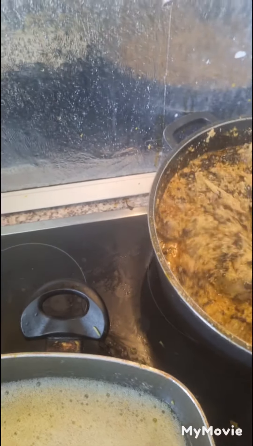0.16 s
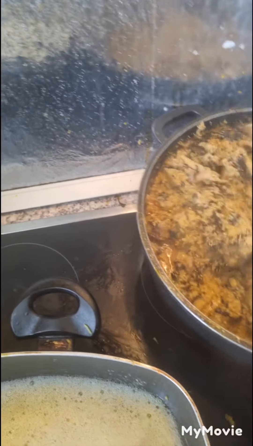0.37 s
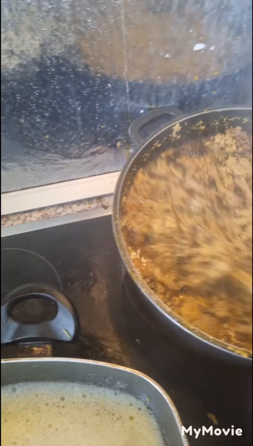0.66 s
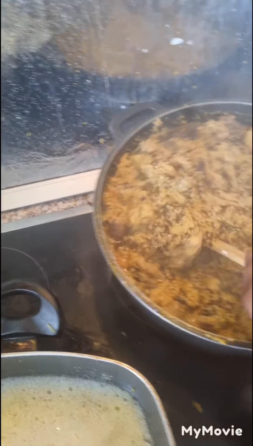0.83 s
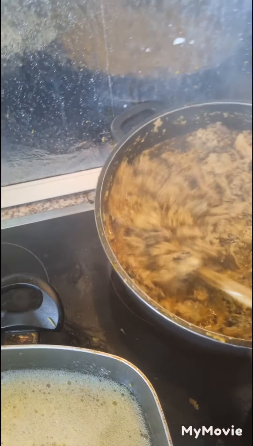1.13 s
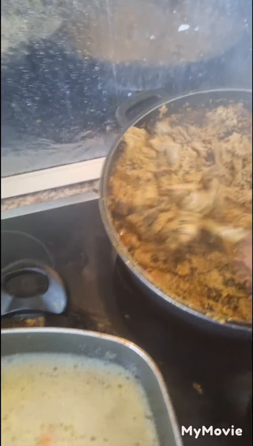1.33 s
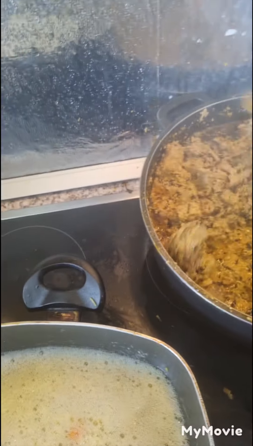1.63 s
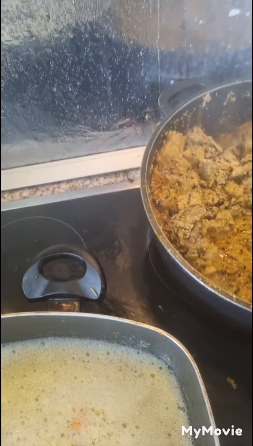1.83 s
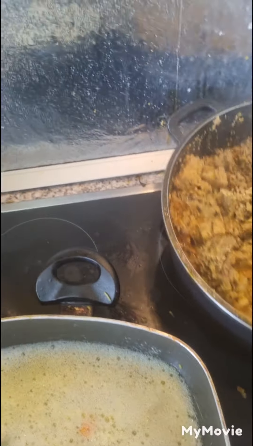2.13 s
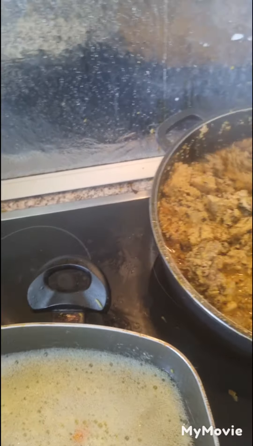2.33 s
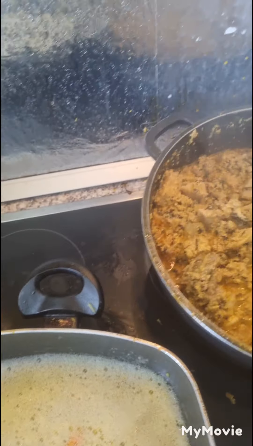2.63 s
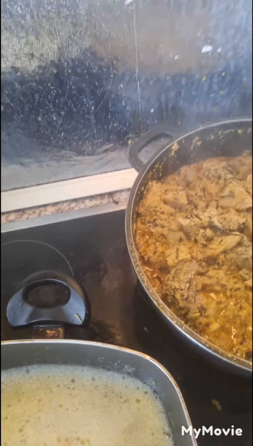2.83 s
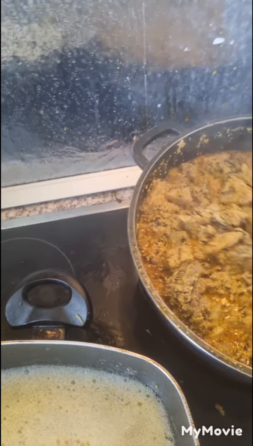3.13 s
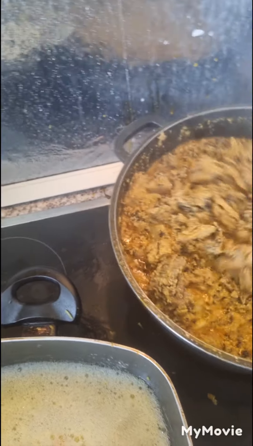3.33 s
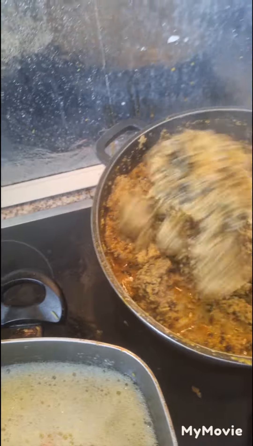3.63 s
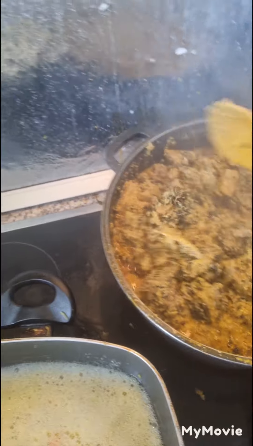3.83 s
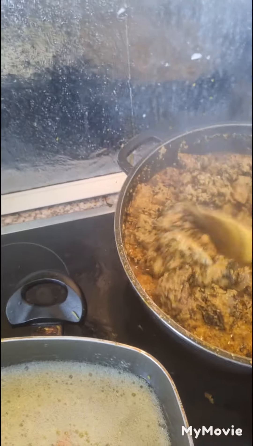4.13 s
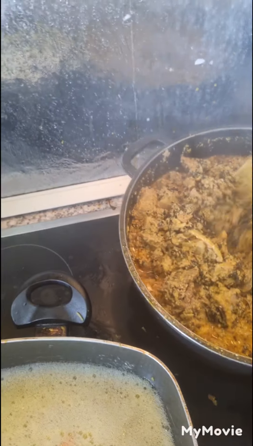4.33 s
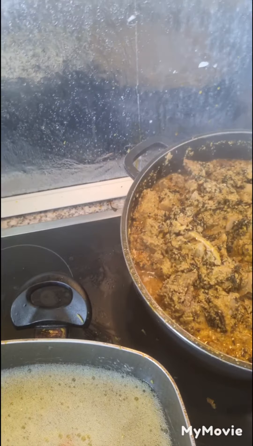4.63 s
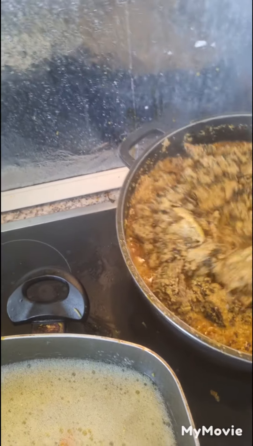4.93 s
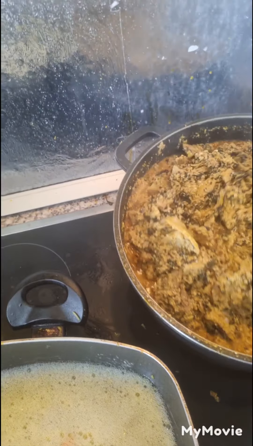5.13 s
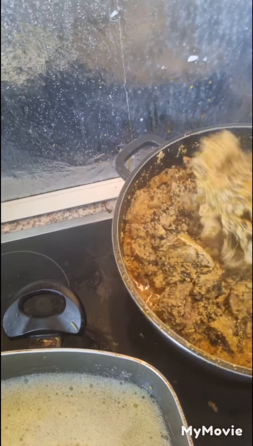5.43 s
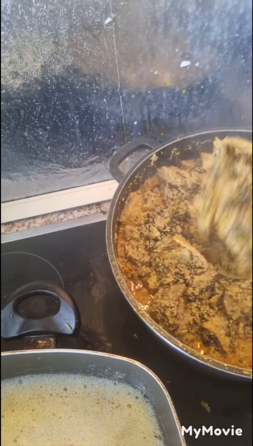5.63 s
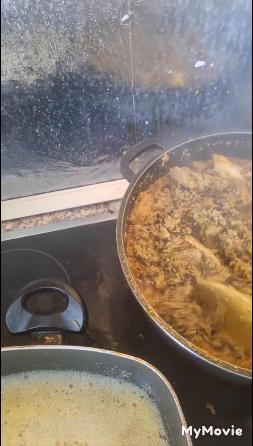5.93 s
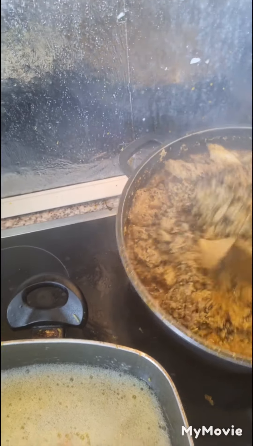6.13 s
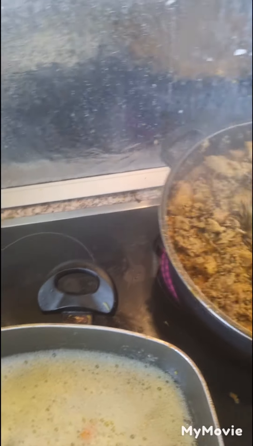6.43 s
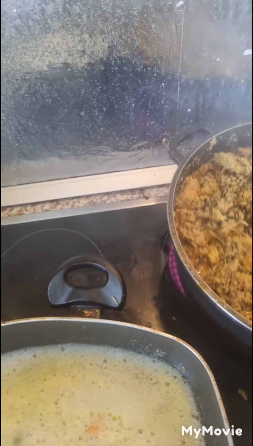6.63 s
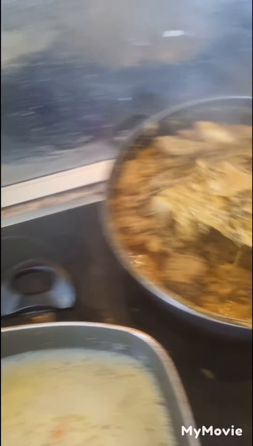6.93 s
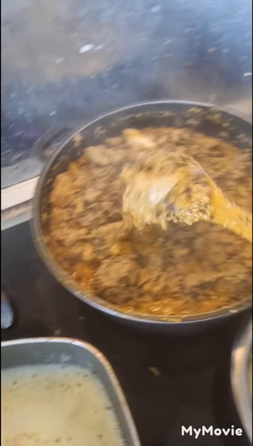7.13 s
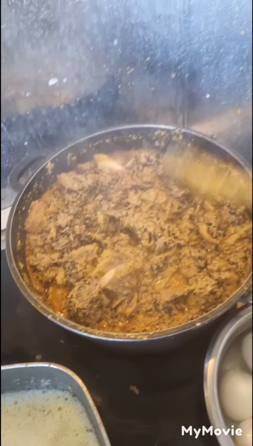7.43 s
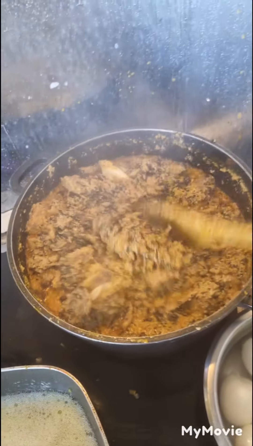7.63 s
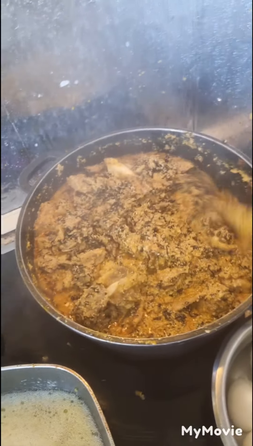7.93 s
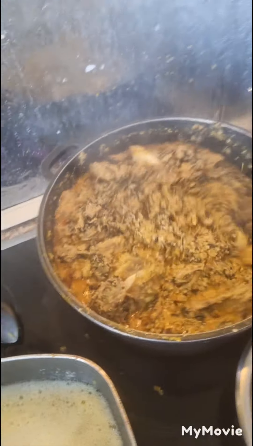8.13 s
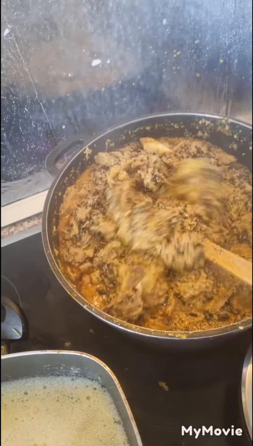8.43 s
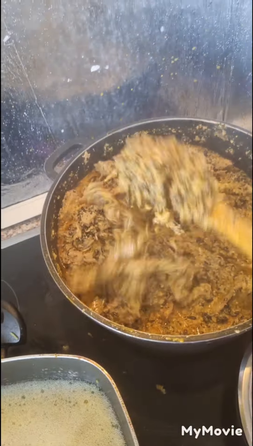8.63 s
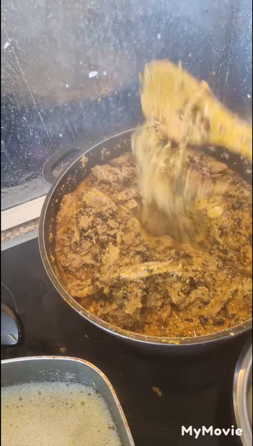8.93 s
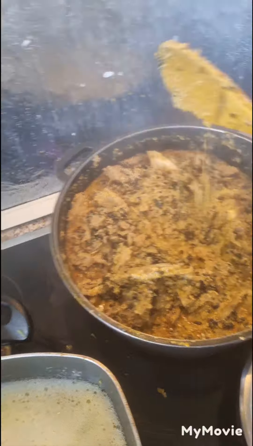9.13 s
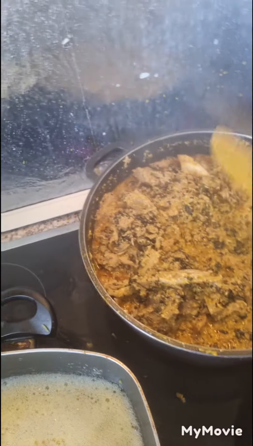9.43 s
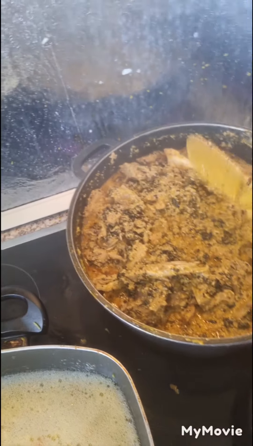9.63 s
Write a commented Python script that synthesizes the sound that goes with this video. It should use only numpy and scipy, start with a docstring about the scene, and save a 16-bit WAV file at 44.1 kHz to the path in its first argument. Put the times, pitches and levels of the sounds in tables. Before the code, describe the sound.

Thick stew simmers with low plops and crackly wet pops while a spoon drags and bumps around the pot, finally knocking its rim three times.

```python
"""Stirring a thick stew

A wooden spoon stirs a stew in a wide metal pot on a glass hob, a phone held above it in a small kitchen.
Spoon drags and knocks ring decaying modes of pot and hob glass, and each stroke hums in a narrow band.
Bubbles are short chirps rising in pitch, squelch and sizzle are coloured puffs of noise, and each wet spit
is a crack of noise with a blip and a bright spray. A short dull room tail and a low hush lie around it.
"""
import sys
import numpy as np
from scipy import signal
from scipy.fft import rfft, irfft
from scipy.io import wavfile
from scipy.ndimage import uniform_filter1d

SR = 44100
rng = np.random.default_rng(int(sys.argv[2]) if len(sys.argv) > 2 else 0)


def master(y):
    """Save y as 16-bit WAV."""
    cut = np.clip(np.atleast_2d(y).T, -1, 1)
    pcm = np.round(cut * 32767)  # scale
    wavfile.write(sys.argv[1], SR, pcm.astype(np.int16))


N = 430853

# Spoon on the pot; short contacts knock, long ones skid. Levels stand before each pot part's trim.
# Each row: start in seconds, wall level in dB, then base, belly and rim in dB above the wall,
# wall colour in Hz, contact length in seconds.
TOUCHES = [(0.026, -24, -33, -14.5, -13, 840, 0.0031), (0.054, -21, -31, -41, -14, 1310, 0.012),
           (0.066, -32, -24, -23, -5, 1380, 0.015), (0.287, -33, 10, -3, -14, 651, 0.0067),
           (0.315, -32.5, -1, -8, -5, 806, 0.016), (0.461, -36.5, -12, 1, -1, 1200, 0.016),
           (0.68, -44.5, 14.5, 19, -15, 698, 0.0057), (0.788, -21.5, -25, -27, -22, 970, 0.006),
           (0.803, -23, -25, -18, -15.5, 865, 0.013), (1.204, -48, 24.5, 27.5, -16, 680, 0.0036),
           (1.559, -40.5, -26, 4.5, -1, 662, 0.012), (1.752, -27, -13.5, 3.5, -17, 1184, 0.0063),
           (2.525, -38, 2.5, 12.5, -16, 740, 0.0048), (2.719, -43.5, 11.5, 0.5, -20, 840, 0.008),
           (3.052, -42.5, 11, 3, -7, 1040, 0.011), (4.511, -35.5, 7, 7.5, -1.5, 1052, 0.0048),
           (4.754, -38.5, 0.5, -15, -2, 956, 0.019), (4.862, -36, -1, -8, -5, 868, 0.014),
           (5.164, -39.5, -7, -15, -11, 848, 0.011), (5.235, -34.5, -12, -8, -16.5, 673, 0.016),
           (5.268, -32, -10, -7, -15, 685, 0.016), (5.313, -30, -17.5, -14.5, -31, 665, 0.015),
           (5.43, -36.5, -19.5, -14, -8.5, 836, 0.018), (6.111, -28, -12, -43, -24.5, 1390, 0.0079),
           (6.344, -34, -16.5, -20, -7.5, 1420, 0.011), (6.562, -32, 3.5, 3, -19.5, 712, 0.0033),
           (6.584, -32, -20, -17.5, -22.5, 630, 0.015), (6.72, -29, 7.5, 1.5, -3, 615, 0.00071),
           (6.851, -38, -24, -24, -22.5, 870, 0.021), (8.129, -41, 3, 1.5, -12, 626, 0.016),
           (8.469, -37, -10, -5, -13, 776, 0.024), (8.539, -30, -14.5, -11, -24.5, 804, 0.015),
           (8.556, -33.5, -29.5, -5.5, -7.5, 970, 0.015), (9.386, -16.5, 2.5, -0.5, -28, 846, 0.004),
           (9.552, -17, 1.5, -3, -30, 870, 0.0032), (9.713, -15.5, 0, -5.5, -14, 689, 0.0049)]


def undb(db):
    """Decibels to gain."""
    return 10 ** (np.asarray(db) / 20)


def unit(x):
    """Scale a sound to an rms of 1."""
    return x / np.sqrt(np.mean(x ** 2))


def colour(x, points):
    """Shape a spectrum by (Hz, dB) points, 40 dB down an octave beyond both ends."""
    hz, db = np.transpose(points)
    log_f = np.log(np.maximum(np.fft.rfftfreq(len(x), 1 / SR), 1))
    log_points = np.log(np.r_[hz[0] / 2, hz, hz[-1] * 2])
    curve_db = np.interp(log_f, log_points, np.r_[db[0] - 40, db, db[-1] - 40])
    return irfft(rfft(x) * undb(curve_db), len(x))


def clicks(rate, spread_db):
    """Random clicks of either sign at a mean rate per second, most small and a few large."""
    happens, sign, loud = rng.random((N, 3)).T
    size = undb(-spread_db * np.log(1 - .995 * loud))
    return (happens < rate / SR) * np.sign(sign - .5) * size


def walk(t, rate):
    """Random levels, a number per second, joined by straight lines."""
    return np.interp(t * rate, np.arange(200), rng.standard_normal(200))


def activity():
    """Powers of simmer, strokes and knocks add up to the level of each layer.

    Returns dB of base, bubbling, wall, squelch, sizzle and stroke hollow, then the scrape colour in Hz.
    """
    # Simmering between strokes, before each layer's trim.
    # Each row: time in seconds, then bubbling, squelch and sizzle level in dB.
    simmer = [(0, -60, -62.5, -66), (1.0, -53, -52.5, -57.5), (1.55, -55.5, -57.5, -57.5),
              (1.68, -59, -69.5, -63), (1.85, -58.5, -60, -64), (2.252, -60, -60.5, -56),
              (2.7, -52.5, -56.5, -58), (3.5, -54, -54, -59.5), (4.001, -56, -55, -63),
              (4.5, -53.5, -54.5, -60.5), (5.019, -53, -48, -48.5), (5.12, -64, -64, -56.5),
              (5.3, -52, -54.5, -63.5), (6.4, -57.5, -55.5, -52.5), (7.0, -55, -57, -60.5),
              (7.9, -53.5, -49.5, -55.5), (8.2, -52.5, -58, -53), (8.42, -60.5, -60.5, -63),
              (8.7, -52.5, -52, -57.5), (9.0, -53, -54.5, -65), (9.3, -54.5, -54.5, -57.5),
              (9.77, -66, -49, -53)]
    # Spoon strokes through the stew, before each layer's trim.
    # Each row: middle in seconds, length in seconds, drag on the base in dB, scrape on the wall in dB,
    # squelch in dB, scrape colour in Hz.
    strokes = [(0.0, 0.046, -31.5, -51.5, -44, 1140), (0.081, 0.18, -43, -44, -47.5, 1260),
               (0.276, 0.23, -30.5, -39.5, -46.5, 766.7), (0.49, 0.15, -42, -43, -49, 1010),
               (0.729, 0.19, -32.5, -48, -49, 890), (0.811, 0.28, -52, -44, -73, 918),
               (1.187, 0.2, -32, -54.5, -50, 770), (1.588, 0.14, -53, -52.5, -56, 870),
               (1.787, .14, -47, -48.5, -46.5, 970), (2.414, 0.11, -49, -52.5, -52.5, 950),
               (2.558, 0.14, -30.5, -46.5, -43, 870), (2.887, 0.24, -42, -51.5, -46, 885),
               (3.104, 0.17, -36, -43, -47.5, 947), (3.208, .12, -37, -35, -39.5, 930),
               (3.374, 0.3, -60, -47.5, -70, 701), (3.604, 0.037, -59, -43, -60, 916),
               (4.194, 0.29, -55.5, -54, -55, 950), (4.547, .1, -49, -49, -44.5, 937),
               (4.775, 0.21, -37.5, -63, -62, 870), (4.901, 0.144, -36, -31.5, -41, 818.5),
               (4.99, 0.11, -49.5, -40.5, -46, 723), (5.191, 0.14, -50, -47.5, -58, 802),
               (5.424, 0.17, -65, -49.5, -58, 740), (5.74, 0.15, -59, -59.5, -50, 886),
               (6.083, 0.17, -41.5, -47.5, -45.5, 996), (6.258, 0.076, -47, -50.5, -51.5, 870),
               (6.599, 0.2, -38, -52, -48.5, 760), (6.861, 0.19, -58.5, -52, -59, 910),
               (7.212, 0.15, -54, -56.5, -52, 872), (7.351, 0.097, -45.5, -53, -45.5, 1100),
               (7.673, 0.088, -56, -75, -66, 914), (8.054, 0.35, -41, -48, -50, 880),
               (8.235, 0.13, -51, -49, -47, 810), (8.565, 0.083, -53, -36.5, -47, 785),
               (9.031, 0.15, -57.5, -45.5, -47.5, 1030)]
    # The sizzle flares where stew meets hot metal. Each row: start in seconds, level in dB.
    flares = [(0.53, -47), (1.97, -57), (2.2, -50), (3.72, -43.5), (4.54, -47), (5.1, -49.5), (5.73, -44.5),
              (5.969, -41.5), (6.23, -52), (6.45, -70), (6.939, -52.5), (7.179, -43.5), (7.34, -49),
              (7.601, -40), (8.62, -53), (8.79, -55), (8.94, -40.5)]
    # A knock shakes the stew: dB added for base, bubbling, wall, squelch and sizzle.
    knock_wake_db = (-12, -21.5, -16.5, -28, -38)
    # Spread of the simmer's flicker in dB: base, bubbling, wall, squelch, sizzle.
    flicker_db = (2.5, 2.2, 4, 2.3, 5.9)
    knock_wake_s, flare_fade_s = 0.025, 0.013  # time to fall to 1/e in power
    stroke_rise, scrape_sag = 0.51, 0.067  # share of a stroke spent rising; share by which its colour sinks
    drag_boil_db, squelch_sizzle_db = -13, -8  # a drag also frees bubbles, a squelch also sizzles

    t = np.arange(0, N + 64, 64) / SR
    s, *calm = np.transpose(simmer)
    boil, squelch, sizzle = (np.interp(t, s, c) for c in calm)
    # bubbling shakes the base, and the wall hums along with the squelch
    power = undb(2 * np.array([boil + 2, boil, squelch + 1.5, squelch, sizzle]))
    # scrape colour is the mean of simmer (around 870 Hz) and strokes, weighted by wall power
    tint = power[2] * 870 * (1 + .12 * walk(t, 8))
    stir = np.zeros_like(power)
    for mid, length, drag, scrape, wet, hz in strokes:
        along = np.clip((t - mid) / length, -.5, .5)
        rise_fall = np.interp(along, [-.5, stroke_rise - .5, .5], [0, 1, 0])
        swell = np.sin(np.pi / 2 * rise_fall) ** 2
        levels = np.array([drag, drag + drag_boil_db, scrape, wet, wet + squelch_sizzle_db])
        stir += undb(2 * levels)[:, None] * swell
        tint = tint + undb(2 * scrape) * swell * hz * (1 - scrape_sag * along)
    scrape_hz = tint / (power[2] + stir[2])
    hollow = stir[2] + 1e-12

    def fading(at, fade_s):
        """Sudden start and exponential fall."""
        return (t > at) * np.exp(-np.abs(t - at) / fade_s)

    for at, wall, base, *_ in TOUCHES:
        wake = undb(2 * (wall + min(base, 0) + np.array(knock_wake_db)))
        stir += wake[:, None] * fading(at, knock_wake_s)
    stir[4] += sum(undb(2 * db) * fading(at, flare_fade_s) for at, db in flares)
    flicker = undb(2 * np.array([db * walk(t, 12) for db in flicker_db]))
    levels_db = 10 * np.log10([*power * flicker + stir, hollow])
    return [np.interp(np.arange(N) / SR, t, c) for c in (*levels_db, scrape_hz)]


def contacts(skids, count=12):
    """Sample places and sizes of the touches in each knock: the longer the skid, the more even the chatter."""
    s, skid = np.array(TOUCHES)[:, [0, -1]].T
    skid = skids * np.clip(skid, 0, .06)[:, None]
    when, size = rng.random((len(s), count, 2)).transpose(2, 0, 1)
    first = np.arange(count) == 0
    first_size = np.clip(1.2 - skid / 0.014, .2, 1)
    chatter_size = (2 * size - 1) * np.clip(skid / 0.0075, 0, 1.2)
    size = np.where(first, first_size, chatter_size)
    at = (s[:, None] + ~first * when * skid) * SR
    return np.minimum(at.astype(int), N - 1), size / np.sqrt(np.sum(size ** 2, 1, keepdims=True))


def near(hz, colour_hz, octaves=0.42, far=0.12):
    """Where the spoon touches decides which modes answer best."""
    if colour_hz is None:
        return 1
    return far + np.exp(-.5 * (np.log2(hz / colour_hz) / octaves) ** 2)


def ring(x, hz, t60):
    """One decaying mode as a two-pole resonator."""
    r = np.exp(-np.log(1000) / (max(t60, .003) * SR))
    w = 2 * np.pi * hz / SR
    return signal.lfilter([0, r * np.sin(w)], [1, -2 * r * np.cos(w), r * r], x)


def pot_part(part, rub_db, blow_db, slips, spread_db, damp, tail_db, rub_hz=None, blow_hz=None):
    """One family of modes, shaken by stick-slip rubbing and by each knock at a new spot."""
    # Modes of pot and hob glass by part. Each row: frequency in Hz, level in dB,
    # t60 in seconds of the lasting ring.
    pot_modes = {"base": [(56.6, -4.5, 0.29), (99.5, 1, 0.14), (137, -7.5, 0.21), (157, 5, 0.09)],
                 "belly": [(292, -2, 0.046), (315.6, -4.5, 0.044), (376.5, -14.5, 0.15), (423, -7, 0.08),
                 (496, -6, 0.02)], "wall": [(651, -0.5, 0.098), (701, 4, 0.024), (752, -6.5, 0.034),
                 (833.6, 5.5, 0.062), (970, 4, 0.017), (1015, 3.5, 0.031), (1157, 1.5, 0.054),
                 (1235, 4, 0.035), (1372, 7.5, 0.03), (1580, -8, 0.056)], "rim": [(2010, 1, 0.071),
                 (2290, 7.5, 0.069), (2470, 11, 0.026), (2583, 9.5, 0.041), (2800, 13.5, 0.019),
                 (3360, 5, 0.034), (4060, 16, 0.011)]}
    # Spread of mode strength from knock to knock in dB, by part.
    spot_db = {"base": .6, "belly": 2.2, "wall": 2.5, "rim": 2.5}
    modes = pot_modes[part]
    # the heavy base feels one push, the thin parts feel the spoon chatter
    at, size = contacts(part != "base")
    spot = undb(spot_db[part] * rng.standard_normal((len(at), len(modes))))
    rub = unit(clicks(slips, spread_db)) * undb(rub_db)
    # the family's summed response to steady rubbing, and to a single blow
    body = np.sqrt(sum(undb(2 * db) * t60 * SR / (4 * np.log(1000)) for hz, db, t60 in modes))
    total = np.sqrt(sum(undb(2 * db) for hz, db, t60 in modes))
    out = 0
    for k, (hz, db, t60) in enumerate(modes):
        strength = undb(blow_db) * spot[:, k] / total * near(hz, blow_hz)
        blows = np.zeros(N)
        np.add.at(blows, at, size * strength[:, None])
        lasting = rub / body * near(hz, rub_hz) + undb(tail_db) * blows
        # each knock is a lasting ring plus a shorter, more damped one
        rung = ring(lasting, hz, t60) + ring(blows, hz, damp * t60)
        # pairs of modes move in opposite sense
        out = out + (-1) ** (k // 2) * undb(db) * rung
    return out


def pocket(level_db, hz):
    """The hollow that the spoon pulls open hums in one narrow band that moves with the stroke."""
    # noise averaged over 1/140 s keeps the band narrow
    flutter = uniform_filter1d(rng.standard_normal((2, N)), SR // 140, axis=1)
    phase = 2 * np.pi * np.cumsum(hz) / SR
    return unit(flutter[0] * np.sin(phase) + flutter[1] * np.cos(phase)) * undb(level_db)


def spits(width=1.125, blip=0.54):
    """Steam pockets burst: a crack of noise and a short blip at its centre, with a bright spray on top."""
    # Wet spits. Each row: start in seconds, level in dB before a common cut, centre in Hz,
    # treble above it in dB, t60 in seconds.
    bursts = [(0.0258, -19.5, 2610, -3, 0.028), (0.0538, -14, 2520, -17, 0.023),
              (0.0644, -5.5, 2810, -36, 0.025), (0.47, -28, 2570, -27, 0.022), (0.497, -21, 2870, -9, 0.06),
              (0.5224, -10, 3260, -6.5, 0.021), (0.786, -22.5, 2180, -30, 0.03),
              (0.806, -19, 2650, -34, 0.02), (0.9, -29.5, 3130, -2, 0.025),
              (1.385, -22.5, 2600, -27, 0.014), (1.4116, -18, 4140, -41, 0.014),
              (1.729, -20.5, 4530, -15, 0.013), (1.7694, -21.5, 2400, -4.5, 0.034),
              (1.814, -30.5, 3080, 4, 0.05), (2.109, -21.5, 4010, -6, 0.018),
              (2.329, -28, 4300, -3.5, 0.055), (2.343, -29.5, 5390, 5, 0.027),
              (2.4398, -23.5, 4170, -33, 0.022), (2.529, -27, 3970, -5, 0.07),
              (2.7272, -23, 4240, -20, 0.049), (2.7329, -19, 2800, 1.5, 0.013),
              (2.8781, -24, 2760, 0, 0.029), (2.988, -31, 4400, 2, 0.022), (3.1193, -25, 2650, -6, 0.087),
              (3.2076, -18.5, 2177, -7.5, 0.035), (3.219, -21.5, 2823, -18, 0.048),
              (3.6027, -23, 2215, -12, 0.057), (3.645, -32, 3876, 0, 0.028),
              (3.711, -22.5, 2290, 3.5, 0.024), (3.7854, -26.5, 2940, -4, 0.092),
              (3.8353, -25, 2320, -25, 0.021), (3.874, -26, 3320, -29, 0.015),
              (3.967, -24, 3360, -36, 0.017), (4.045, -28.5, 3350, -20, 0.026),
              (4.13, -28, 2520, -19, 0.074), (4.2683, -16, 1954, -37, 0.022),
              (4.3053, -20, 2500, -33, 0.032), (4.351, -23.5, 2080, -18.5, 0.025),
              (4.3963, -19, 2490, -34, 0.054), (4.4557, -30, 2530, -24, 0.057),
              (4.512, -13.5, 2620, 3.5, 0.016), (4.763, -27.5, 2486, -26, 0.033),
              (4.8643, -27.5, 2600, -15, 0.042), (5.236, -27, 2890, -30.5, 0.03),
              (5.3986, -24.5, 7900, -1.5, 0.022), (5.465, -25.5, 3040, -21, 0.038),
              (5.5148, -27, 2690, -11.5, 0.042), (5.6422, -26, 3910, -20, 0.029),
              (5.68, -29, 2650, -5.5, 0.021), (5.7419, -17.5, 3010, -14.5, 0.024),
              (5.826, -25.5, 4400, -30, 0.022), (5.892, -30, 4640, -28, 0.03),
              (5.9394, -27.5, 3340, -4.5, 0.056), (6.1117, -5.5, 3564, -20.5, 0.016),
              (6.349, -29.5, 2860, -30, 0.015), (6.379, -27, 2710, -32, 0.063),
              (6.504, -18, 3460, -32.5, 0.031), (6.5843, -22, 2180, -28.5, 0.027),
              (6.674, -22.5, 4520, -24.5, 0.022), (6.7206, -16, 1780, -36, 0.031),
              (7.011, -25.5, 3900, -8, 0.023), (7.086, -28.5, 3160, -30, 0.021),
              (7.322, -18.5, 2630, -17, 0.013), (7.346, -25.5, 2570, -2, 0.027),
              (7.47, -31.5, 8200, 6, 0.019), (7.4845, -16.5, 2120, -14, 0.021),
              (7.7103, -30, 2280, -10, 0.022), (7.8165, -23.5, 2470, -32.5, 0.018),
              (7.8334, -16, 3150, -33.5, 0.0099), (7.9449, -30, 2850, -4, 0.027),
              (7.9613, -22, 4280, -1, 0.061), (8.0537, -21.5, 3080, -17, 0.0094),
              (8.076, -18, 2510, -28.5, 0.021), (8.098, -22, 2570, -11.5, 0.038),
              (8.5335, -27, 4060, -21, 0.017), (8.5618, -27, 2290, -18, 0.048),
              (8.6985, -28, 2525, -15, 0.03), (8.7516, -21.5, 3700, -13, 0.019),
              (8.817, -14, 9200, -20.5, 0.0067), (8.9337, -13, 3104, 1.5, 0.03),
              (8.964, -9, 2680, -6, 0.017), (9.0072, -16, 3370, -3, 0.079),
              (9.1026, -16.5, 3020, -22.5, 0.012), (9.1245, -22, 1870, -31, 0.019),
              (9.2, -30.5, 8980, 6, 0.02), (9.231, -29, 2580, -1, 0.023), (9.3849, -10.5, 2780, -2, 0.021),
              (9.5283, -32.5, 2494, 7, 0.023), (9.551, -15, 2590, -9, 0.023),
              (9.7118, -22.5, 2400, -27, 0.026)]
    out, t = np.zeros(N + SR), np.arange(SR // 8) / SR
    for (s, db, hz, treble_db, t60), bright in zip(bursts, rng.random(len(bursts))):
        wet, spray = rng.standard_normal((2, len(t)))
        band = signal.butter(1, [hz / width, hz * width], "band", fs=SR, output="sos")
        # each spit's spray gets a random brightness
        spray_hz = [4500 + 3000 * bright, 11000 + 8000 * bright]
        spray_band = signal.butter(1, spray_hz, "band", fs=SR, output="sos")
        rise = 1 - np.exp(-t / (0.12 * t60))
        fade = rise * np.exp(-np.log(1000) * t / np.clip(t60, .004, .12))
        crack = unit(signal.sosfilt(band, wet))
        crack += undb(treble_db) * unit(signal.sosfilt(spray_band, spray))
        crack += blip * np.sin(2 * np.pi * hz * t * (1 + 2.4 * t))
        i = int(s * SR)
        out[i:i + len(t)] += undb(db - 7.0) * fade * crack
    return out[:N]


def bubbles(level_db, count, low_hz, span, cycles, glide, spread_db):
    """Bursting pockets of steam: a few cycles each, rising in pitch."""
    out = np.zeros(N + SR)
    for when, size, loud in rng.random((count, 3)):
        hz = low_hz * span ** size
        turns = np.arange(int(2 * cycles * SR / hz)) * hz / SR
        tone = np.sin(2 * np.pi * turns * (1 + glide * turns / cycles / 2))
        plop = tone * np.exp(-3.5 * turns / cycles)
        i = int(when * N)
        out[i:i + len(plop)] += plop * undb(-spread_db * np.log(1 - .99 * loud))
    return unit(out[:N]) * undb(level_db)


def puffs(rate, spread_db, fade_s, steady):
    """Noise that swells in short puffs over a steady share."""
    swell = np.abs(clicks(rate, spread_db))
    # one-pole smoothing twice: a quick rise and a slower fall
    for s in (fade_s, fade_s / 3):
        swell = signal.lfilter([1], [1, -np.exp(-1 / (s * SR))], swell)
    return rng.standard_normal(N) * (steady + unit(swell))


def squelching(level_db):
    """Low, middle and high pockets squelch as noise puffs, each in their own time."""
    # Squelch spectrum. Each row: frequency in Hz, level in dB per Hz.
    wet_points = [(1500, -4.5), (2000, -3.5), (2600, 1), (3300, 7), (4200, -1), (5200, -4.5), (6600, -18.5)]
    wet = sum(unit(colour(puffs(90., 3.0, 0.0058, 0.45), wet_points[k:k + 3])) for k in range(0, 6, 2))
    return wet * undb(level_db)


def sizzling(level_db):
    """Lower and upper sizzle are noise puffs over a strong steady hiss, each in its own time."""
    # Sizzle spectrum. Each row: frequency in Hz, level in dB per Hz.
    fry_points = [(6000, 1), (7000, -2), (8300, 6.5), (10000, -5.5), (12000, -4), (14000, -4.5),
                  (16000, -7)]
    parts = (fry_points[:4], fry_points[3:])
    fry = sum(unit(colour(puffs(80., 4.4, 0.0035, 0.98), part)) for part in parts)
    return fry * undb(level_db)


def kitchen(x):
    """Tiles and cupboards return a short dull tail."""
    t60_s, level_db = 0.12, -15
    t = np.arange(SR // 2) / SR
    dull = signal.lfilter([1], [1, -.5], rng.standard_normal(len(t)))
    tail = dull * (t > .004) * undb(-60 * t / t60_s)
    return x + undb(level_db) * signal.fftconvolve(x, tail / np.sqrt(np.sum(tail ** 2)))[:N]


def kitchen_hush():
    """Steady coloured noise lies under everything."""
    # Hush spectrum. Each row: frequency in Hz, level in dB per Hz.
    hush_points = [(15, -39), (25, 18.5), (117, 12.5), (223, -2), (317, -15.5), (545, -6.5), (818, 0),
                   (1440, -69), (4140, -30), (12900, -54), (16000, -37)]
    return unit(colour(rng.standard_normal(N), hush_points)) * undb(-54.5)


def scene():
    """Pot and stew sound within the room, over its hush."""
    drag, boil, scrape, squelch, sizzle, hollow, scrape_hz = activity()
    _, knock, base, belly, rim, knock_hz, _ = np.transpose(TOUCHES)
    pot = pot_part("base", drag - 1.5, knock + base - 6.5, 300., 1.0, damp=0.62, tail_db=10)
    pot = pot + pot_part("belly", boil - 4, knock + belly + 0.86, 400., 3.34, damp=0.44, tail_db=-3)
    pot = pot + pot_part("wall", scrape - 3.5, knock + 0.9, 1500., 4.8, damp=0.69, tail_db=-3.5,
                         rub_hz=scrape_hz, blow_hz=knock_hz)
    pot = pot + pot_part("rim", squelch - 8, knock + rim, 1500., 8.8, damp=0.2, tail_db=7.5)
    hum = pocket(hollow - 7.5, scrape_hz)
    plops = bubbles(boil - 4, count=1200, low_hz=213, span=2.235, cycles=3.6, glide=0.12, spread_db=5.0)
    blips = bubbles(squelch - 7, count=2200, low_hz=1500, span=3.6, cycles=11., glide=.08, spread_db=3.)
    stew = plops + blips + squelching(squelch - 10.5) + sizzling(sizzle - 7) + spits()
    return (kitchen(pot + hum + stew) + kitchen_hush())[None]


def record(dry):
    """The phone drops the deepest bass and cuts the top."""
    low_cut = signal.sosfilt(signal.butter(3, 42, "high", fs=SR, output="sos"), dry)
    # steep low-pass at 15.9 kHz
    return signal.sosfilt(signal.ellip(10, .3, 70, 15900, fs=SR, output="sos"), low_cut)


dry = scene()
out = record(dry)
master(out)
```